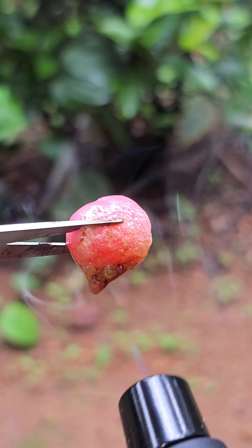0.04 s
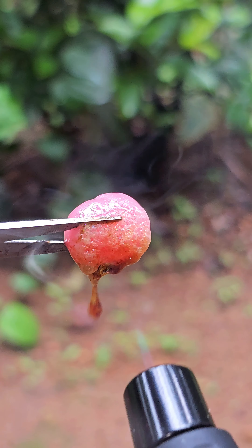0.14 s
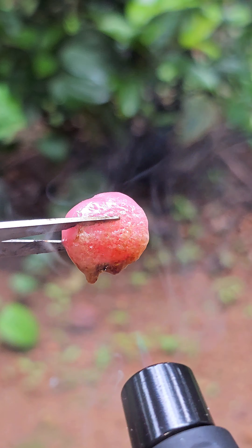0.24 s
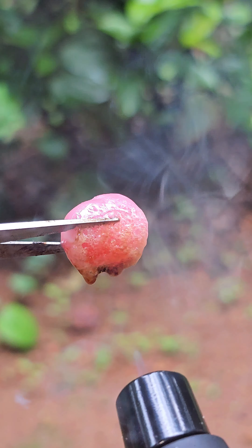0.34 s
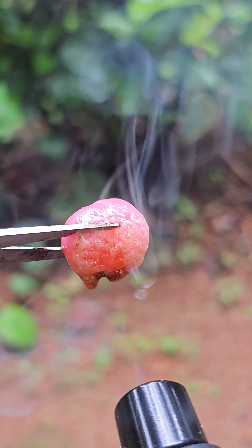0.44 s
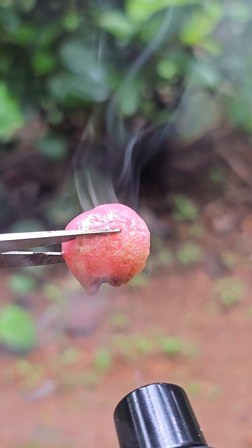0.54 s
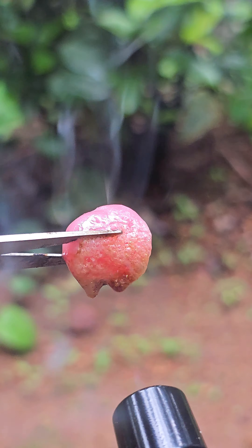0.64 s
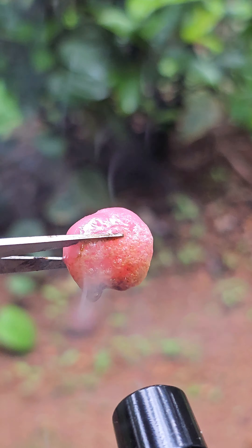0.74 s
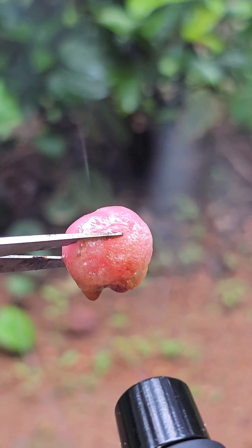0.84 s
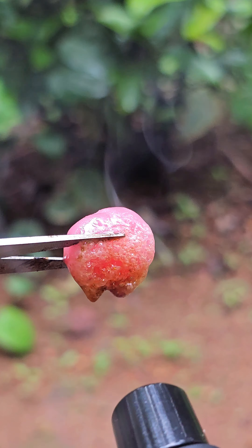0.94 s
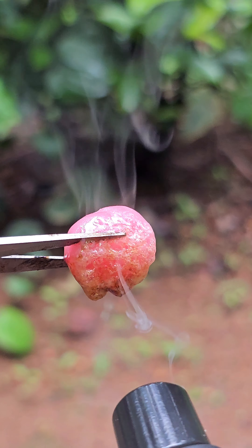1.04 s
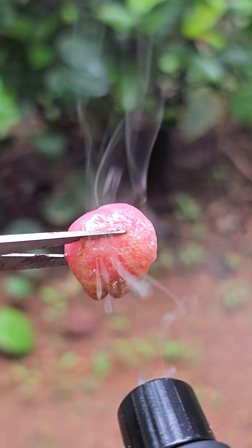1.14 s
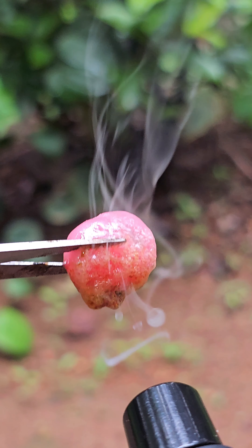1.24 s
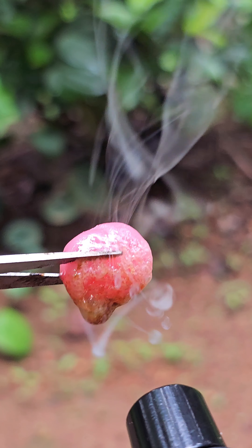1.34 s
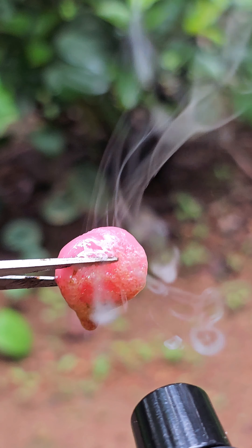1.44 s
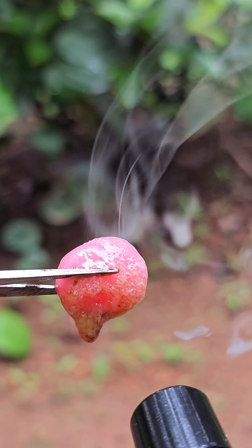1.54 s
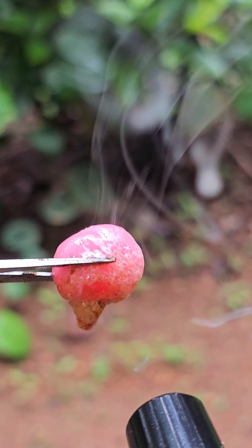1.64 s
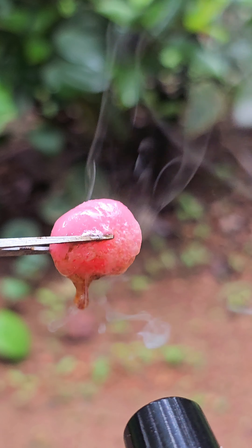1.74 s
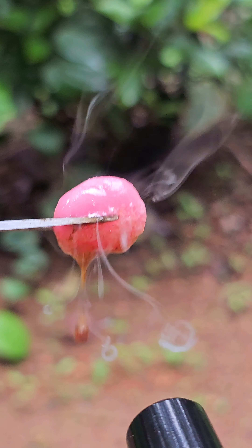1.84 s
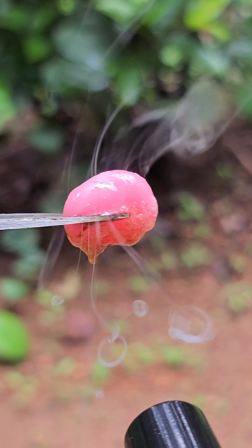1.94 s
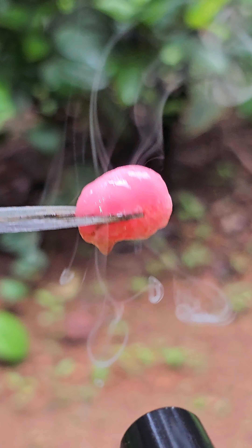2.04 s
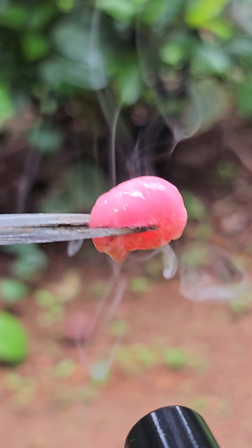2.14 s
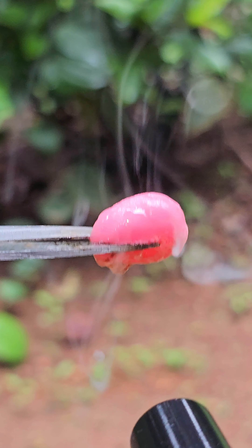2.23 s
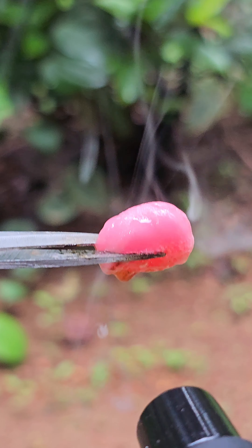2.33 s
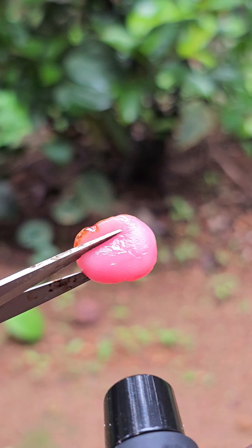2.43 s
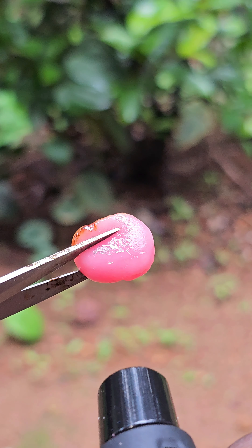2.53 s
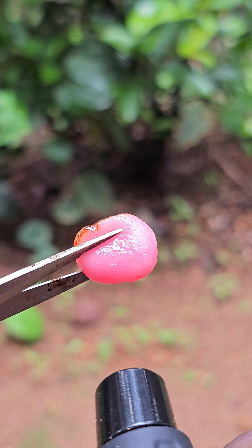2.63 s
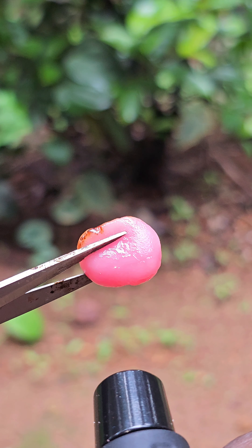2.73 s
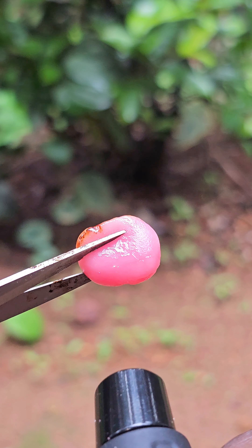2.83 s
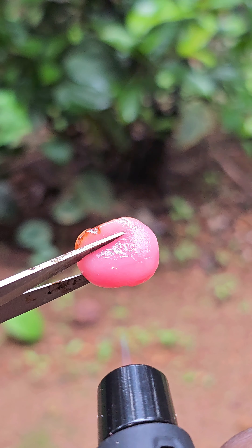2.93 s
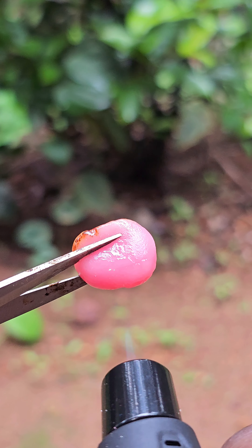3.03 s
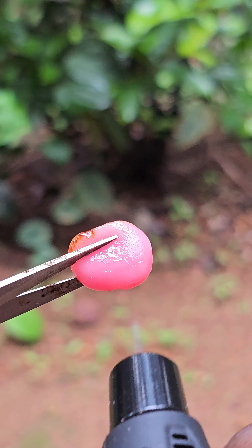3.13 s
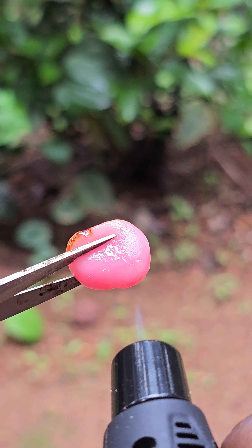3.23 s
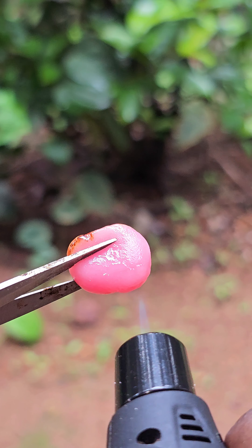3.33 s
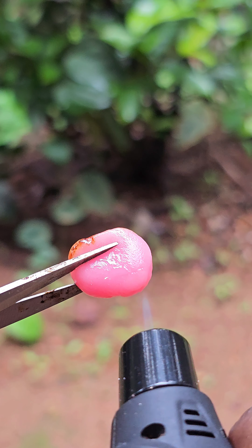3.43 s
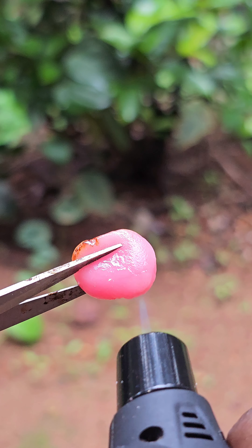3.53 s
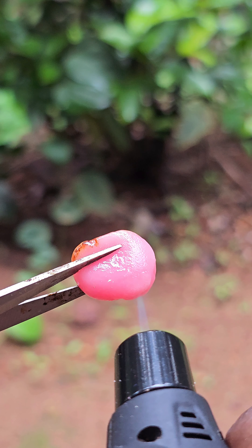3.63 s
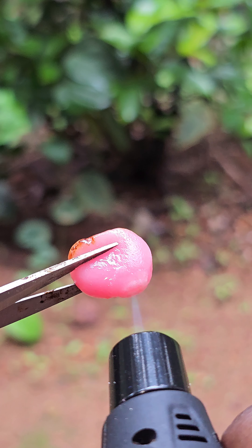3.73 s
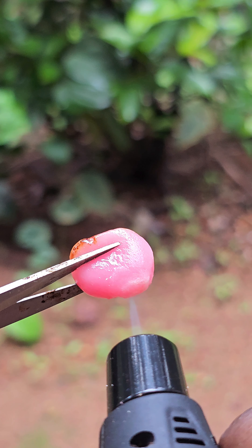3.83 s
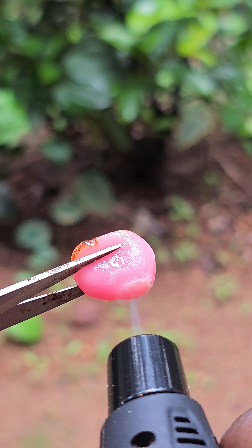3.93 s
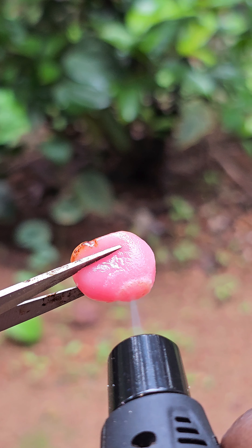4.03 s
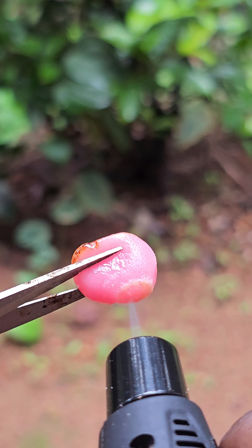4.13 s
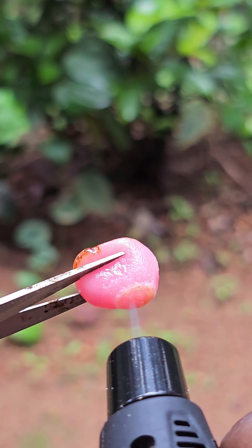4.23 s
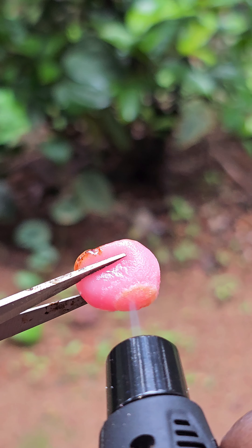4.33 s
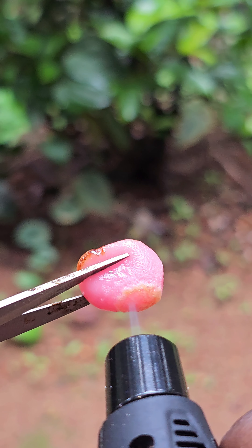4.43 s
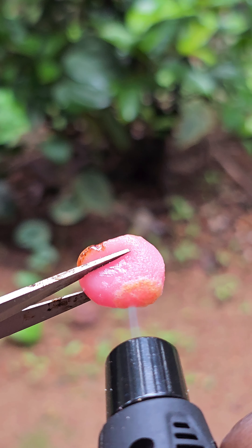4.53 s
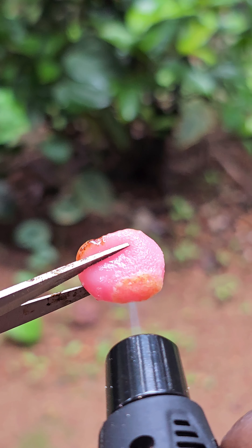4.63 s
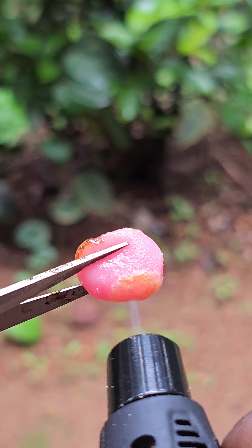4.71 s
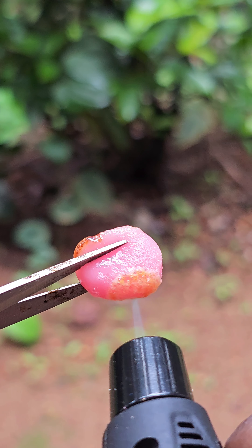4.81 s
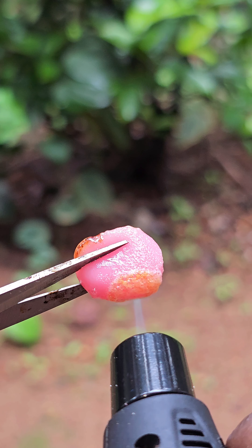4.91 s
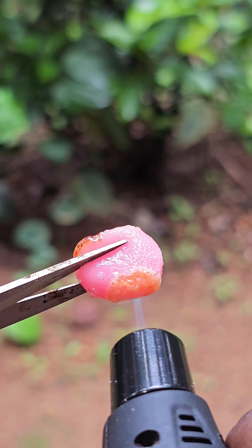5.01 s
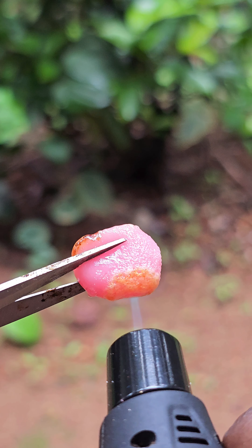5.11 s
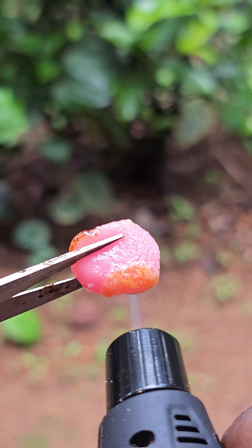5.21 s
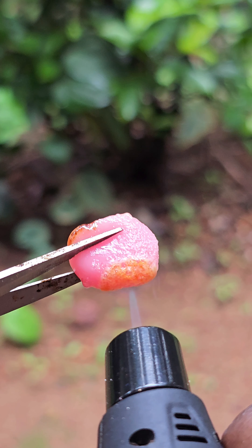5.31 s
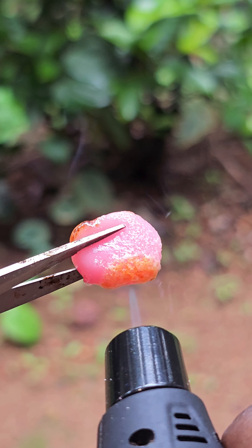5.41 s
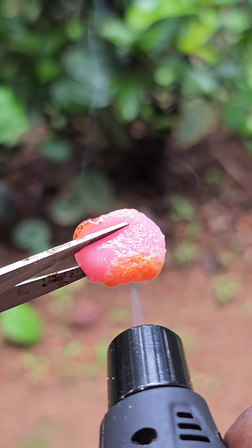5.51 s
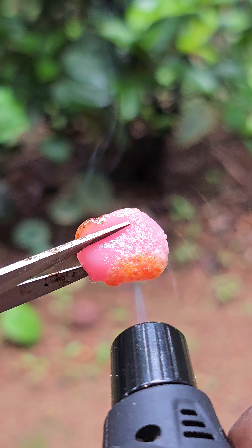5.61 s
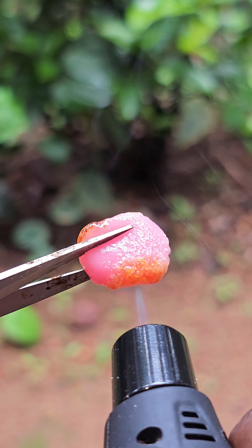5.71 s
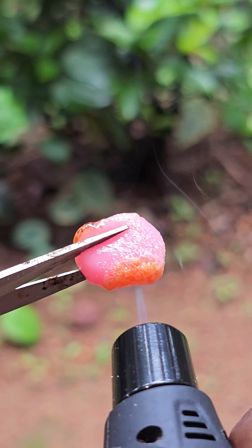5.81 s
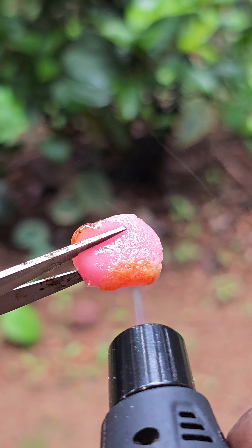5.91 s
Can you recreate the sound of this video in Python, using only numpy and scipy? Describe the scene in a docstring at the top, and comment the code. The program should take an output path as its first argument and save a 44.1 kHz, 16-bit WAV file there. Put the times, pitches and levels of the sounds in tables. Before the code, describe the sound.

Near stereo microphone in a quiet garden: airy, roaring jet flame for about a second, then a plastic-metal trigger click and abrupt silence. In the pause, small bubbles pop and fizz, with a soft knock and thin steamy squeals above faint low rumble. Cold gas begins to hiss, the igniter cracks hard with a short metallic ring and dull pop, and the bright flame hiss resumes and continues.

```python
"""Butane torch on a sweet

A butane jet torch melts a sweet held in tweezers, outdoors: shaped stereo noise hisses and flutters.
The trigger snaps back with struck modes and cracks; the starved flame sputters, whistles and goes out.
Noise bursts tick, sugar sizzles and narrow noise squeals in the pause, over soft air and far machines.
Gas hisses unlit, the piezo igniter cracks, the gas catches with a low thump and the jet burns on."""
import sys
import numpy as np
from scipy.fft import rfft, irfft, next_fast_len
from scipy.io import wavfile
from scipy.ndimage import uniform_filter1d, map_coordinates

SR = 44100
rng = np.random.default_rng(int(sys.argv[2]) if len(sys.argv) > 2 else 0)


def inscribe(sig):
    """Save sig as 16-bit PCM at rate SR to the path in sys.argv[1].

    A 1-D sig is mono; a 2-D sig holds one channel per row.
    Samples are clipped to [-1, 1] before scaling.
    """
    pcm = np.round(np.clip(np.atleast_2d(sig).T, -1, 1) * 32767)
    wavfile.write(sys.argv[1], SR, pcm.astype(np.int16))


N = 262836

OFF, LIT = 0.95, 2.936  # the first flame starts to starve, the gas lights (s)

# stereo image of the torch in its first position: f/Hz, left phase lead/rad, likeness of the ports/0-1
FIRST_IMAGE = [(100, 0, 0.98), (600, 0, .88), (1300, 0.7, 0.8), (2300, 0.55, 0.76), (3480, 1.66, 0.8),
               (4220, 2, 0.77), (5000, 3.1, 0.77), (6130, 5.0, 0.68), (7260, 5.5, 0.66), (8200, 7, 0.8),
               (10900, 10.5, 0.3), (11800, 11, 0.5), (14000, 6, 0.26), (15600, 24, 0.5)]
# stereo image of the torch in its second position: f/Hz, left phase lead/rad, likeness of the ports/0-1
SECOND_IMAGE = [(100, -0.5, 1), (493, 0.13, 0.86), (1300, 0.64, 0.82), (2280, 1, 0.77), (3260, 2.5, 0.66),
                (3680, 3, 1), (4430, 3, 1), (4980, 3, 0.67), (6050, 5.8, 0.79), (7420, 6.5, 0.93),
                (8520, 9, 1), (9300, 10.5, 0.3), (10340, 12.5, 0.5), (12160, 17.5, 0.71),
                (15300, 26.5, 0.55)]
# wide image of air, rattle and sizzle: f/Hz, left phase lead/rad, likeness of the ports/0-1
OPEN_IMAGE = [(60, 0.017, 1), (250, 0, 0.86), (700, 0, 0.17), (3000, 0, 0.05), (12000, 0, .05)]
# modes of the torch body, levels relative to the contact:
# f/Hz, level under the igniter hammer/dB, level under the returning trigger/dB, t60/s
BODY = [(560, -16, -9, .008), (900, -19, -13, .012), (1350, -4.5, 0.5, 0.019), (1950, -15, -9, .016),
        (2750, -16, -11, .008), (3330, -6, -2, 0.016), (3850, -15, -5, .011), (4400, -9, -2, 0.018),
        (5500, -2, -8, .008), (6130, 2, -19, 0.0093), (6950, -13, -11, 0.04), (8100, -8, -22, 0.012),
        (11700, -4, -13, 0.012), (15500, -8, -7, .018)]


def amp(db):
    """Decibels to gain."""
    return 10 ** (np.asarray(db) / 20)


def unit(x):
    """Scale so that the middle of the stereo image has rms 1."""
    middle = np.atleast_2d(x).mean(axis=0)
    return x / np.sqrt(np.mean(middle ** 2) + 1e-20)


def clock():
    """The time of every sample (s)."""
    return np.arange(N) / SR


def along(rows, hz):
    """Each column of a table, read on a log frequency axis."""
    f, *cols = np.transpose(rows)
    return np.array([np.interp(np.log(hz + 1), np.log(f), c) for c in cols])


def curves(rows):
    """Each column of a table, read at every sample."""
    s, *cols = np.transpose(rows)
    return [np.interp(clock(), s, c) for c in cols]


def wobble(rate):
    """A smooth random curve through normally distributed knots, rate knots a second."""
    knots = rng.standard_normal(int(N * rate / SR) + 4)
    steps = np.arange(0, len(knots) - 1, 1 / 8)
    return np.interp(clock() * rate, steps, map_coordinates(knots, [steps]))


def filtered(x, response):
    """Shape the spectrum of x by a response of frequency."""
    size = next_fast_len(N + SR // 4)
    hz = np.fft.rfftfreq(size, 1 / SR)
    return irfft(rfft(x, size) * response(hz), size)[..., :N]


def rise(start, length):
    """A ramp from 0 to 1."""
    return np.clip((clock() - start) / length, 0, 1)


def fade(start, t60):
    """1 until start, then an exponential decay."""
    return amp(-60 * np.clip((clock() - start) / t60, 0, 10))


def blow(start, t60):
    """A quick onset and its decay."""
    return rise(start, length=.0004) * fade(start, t60)


def ring(start, hz, t60, attack):
    """One struck mode: a decaying sine that swells over the time of contact."""
    t = np.arange(int(2 * t60 * SR)) / SR
    mode = np.sin(2 * np.pi * hz * t) * amp(-60 * t / t60) * (1 - np.exp(-t / attack))
    return np.pad(mode, (round(start * SR), N))[:N]


def rush(colour, image):
    """Stereo noise: each port has its own colour, and part of the sound is common to both."""
    def ports(hz):
        lead, alike = along(image, hz)
        turn = np.arccos(np.clip(alike, 0, 1)) / 2
        port = amp(along(colour, hz)) * np.exp(.5j * np.array([lead, -lead]))
        common = port * np.cos(turn)
        opposed = port * np.sin(turn) * [[1], [-1]]
        return np.array([common, opposed])
    return unit(filtered(rng.standard_normal((2, 1, N)), ports).sum(axis=0))


def tone(hz, db, waver, waver_rate, flicker_db):
    """A faint sine that wavers in pitch and comes and goes."""
    pitch = hz * (1 + waver * wobble(waver_rate))
    return amp(db + flicker_db * wobble(25.05)) * np.sin(2 * np.pi * np.cumsum(pitch) / SR)


def murmur(start, length, hz, rate):
    """Narrow noise around a pitch swells and dies away; a higher knot rate makes it breathier."""
    phase = 2 * np.pi * np.cumsum(hz * np.ones(N)) / SR
    noise = wobble(rate) * np.sin(phase) + wobble(rate) * np.cos(phase)
    return np.sin(np.pi * rise(start, length)) * noise


def far_machines():
    """A thin whine, and a far engine that drones and drops away, as wavering tones."""
    # engine drone: t/s, f/Hz, level/dB
    drone = [(0.1, 149.4, -81), (0.4, 135, -67), (0.7, 100.2, -70), (1.1, 97, -65), (1.4, 95, -90)]
    whine = tone(1370, db=-89.5, waver=0.067, waver_rate=210, flicker_db=3.0)
    return whine + tone(*curves(drone), waver=0.04, waver_rate=30, flicker_db=3.5)


def far_swells():
    """Narrow noise, far off, swells faintly in the mid range."""
    # swells: start t/s, length/s, f/Hz, knot rate of the noise/Hz, level/dB
    swells = [(1.78, .24, 1340, 200, -82), (2.22, .5, 1340, 350, -81), (2.36, .42, 1800, 600, -80)]
    return sum(amp(db) * murmur(s, length, hz, rate) for s, length, hz, rate, db in swells)


def garden():
    """Soft outdoor air over a slowly growing rumble and a low throb, with far machines behind."""
    # colour of the air: f/Hz, left level/dB, right level/dB
    colour = [(25, -11, -16), (49.4, -4, -4), (97.5, -11, -10.5), (160, -16, -22), (260, -19, -17),
              (366, -24, -32.5), (910, -30.5, -32.5), (1390, -31.5, -37.5), (2300, -38.5, -41),
              (5140, -41, -36.5), (6900, -49.5, -50.5), (10000, -62, -69), (11700, -43, -44.5),
              (16100, -36.5, -39.5)]
    air = rush(colour, OPEN_IMAGE)
    low = unit(filtered(air, lambda hz: (hz > 30) & (hz < 300)))
    high = unit(filtered(air, lambda hz: hz >= 300))
    pitch = 47 + 1.8 * wobble(6.2)  # Hz
    throb = amp(-0.5 + 4.4 * wobble(6.0)) * np.sin(2 * np.pi * np.cumsum(pitch) / SR)
    lull_db = 6 * np.exp(-((clock() - 3.32) / 0.24) ** 2)  # the rumble dips briefly
    rumble_db = -67.5 + 0.7 * clock() - lull_db
    rumble = amp(rumble_db) * (low + throb)
    return rumble + amp(-75 + 0.75 * wobble(7.97)) * high + far_machines() + far_swells()


def ticks():
    """Bursting sugar bubbles and tweezer ticks, plus the click of the hand's knock on the torch body: short
    decaying bursts of band-shaped noise."""
    # ticks ahead of the stereo tilt: t/s, level/dB, centre f/Hz
    tick_rows = [(1.0135, -63, 5500), (1.018, -57, 1650), (1.234, -73, 11000), (1.2524, -69, 5030),
                 (1.4862, -61, 1650), (1.5617, -69, 5600), (1.5625, -70, 13000), (1.6231, -72, 13500),
                 (1.6400, -74, 13500), (1.7732, -72, 6200), (1.9054, -71, 14000), (2.086, -75, 14000),
                 (2.1953, -76, 8500), (2.553, -72, 3800), (2.2888, -55.5, 6500), (2.2892, -54.5, 14000)]
    width_octaves, t60 = 0.52, 0.015  # t60 in s
    out = np.zeros((2, N))
    t = np.arange(SR // 10) / SR
    hz = np.fft.rfftfreq(len(t), 1 / SR)
    for s, db, centre_hz in tick_rows:
        band = np.exp(-(np.log2((hz + 1) / centre_hz) / width_octaves) ** 2)
        tick = unit(irfft(rfft(rng.standard_normal((2, len(t)))) * band, len(t)))
        out[:, round(s * SR):][:, :len(t)] += amp(db - 60 * t / t60) * tick
    return out


def sizzle():
    """Drops of sugar flare up over a fine crackle that dies down as the sweet cools."""
    # colour of the sizzle: f/Hz, left level/dB, right level/dB
    colour = [(600, -45, -45), (1800, -17, -20), (3000, -10, -7.5), (4500, -5, -8), (5400, -7, 4.5),
              (6200, -8, -4), (8000, -7, -6), (10000, -6, -13), (11400, -17, -0.5), (13000, -11, -15),
              (14500, -7, -9), (15600, -14, -4)]
    # flaring drops ahead of flicker and stereo tilt: t/s, level/dB, t60/s
    flare_rows = [(0.609, -52, 0.22), (2.2864, -57, 0.2), (4.289, -53, .16)]
    flares = sum(amp(db) * blow(s, t60) for s, db, t60 in flare_rows)
    simmer = amp(-78.5 + 4.1 * wobble(150)) * fade(OFF, t60=3.4)
    return (flares * amp(1.6 * wobble(300)) + simmer) * rush(colour, OPEN_IMAGE)


def steam():
    """Steam squeals out of the hot sweet: breathy narrow noise whose pitch sags as it escapes."""
    # squeals ahead of the stereo tilt: start t/s, length/s, starting f/Hz, level/dB
    squeals = [(1.25, .12, 4860, -81), (1.83, .12, 5420, -85), (1.92, .13, 5020, -84),
               (2.03, .17, 4590, -82), (2.345, .09, 5470, -80)]
    sag = 1600  # Hz/s
    out = 0
    for s, length, hz, db in squeals:
        pitch = hz - sag * length * rise(s, length)
        out = out + amp(db) * murmur(s, length, pitch, rate=250)
    return out


def sugar():
    """Bubbles burst, drops flare and steam squeals, each tilted a little to the right."""
    return (ticks() + sizzle()) * amp([[-2], [1.5]]) + steam() * amp([[-5], [2]])


def struck_body(start, modes, level_db, attack):
    """A contact rings the body modes; neighbouring modes swing in opposite directions."""
    return sum((-1) ** k * amp(level_db + db) * ring(start, hz, t60, attack)
               for k, (hz, db, t60) in enumerate(modes))


def burst(noise, envelope):
    """A short burst that keeps the colour and strength of its noise."""
    def smooth(z):
        return np.sqrt(np.abs(uniform_filter1d(np.abs(z) ** 2, size=N // 40)) + 1e-12)
    z = rfft(noise * envelope)
    recoloured = irfft(z * smooth(rfft(noise)) / smooth(z), N)
    return recoloured * np.sqrt(np.mean(envelope ** 2))


def snap(contacts, modes, colour, image, pan_db):
    """Each contact cracks, rings the body and leaves the parts rattling."""
    # colour of the rattle: f/Hz, left level/dB, right level/dB
    rattle_colour = [(100, -45, -45), (300, -17, -9), (1000, -13, -23), (2490, -10, -12), (4300, -3, -1.5),
                     (6300, -4, -4), (7500, -7, -10), (10000, -15, -16), (11700, -9, -10),
                     (13000, -14, -16), (15600, -10, -14)]
    crack, rattle = rush(colour, image), rush(rattle_colour, OPEN_IMAGE)
    out = np.zeros((2, N))
    for s, ring_db, crack_db, crack_t60, rattle_db in contacts:
        body = struck_body(s, modes, ring_db, attack=0.00014)
        # the ringing reaches the right port a little later
        body = np.array([body, np.roll(body, SR // 11000)])
        out += body * amp([[pan_db / 2], [-pan_db / 2]])
        out += amp(crack_db) * burst(crack, blow(s, crack_t60))
        out += amp(rattle_db) * rattle * blow(s, t60=0.23)
    return out


def release():
    """The trigger slips, hits its stop and bounces."""
    # contacts: t/s, ring level ahead of pan/dB, crack level/dB, crack t60/s, rattle level/dB
    contacts = [(0.9618, -56, -41, .04, -70), (0.965, -32, -27.5, .010, -61),
                (0.9665, -40, -36.5, .018, -67)]
    # colour of the crack: f/Hz, left level/dB, right level/dB
    colour = [(150, -30, -30), (540, -11, -11), (780, -11, -17), (1340, 0, -9), (2404, -12, -12),
              (3000, -1, 1), (3900, -3, 2), (4730, -4, 3), (5500, -11, -3), (7000, -5, -8),
              (8440, -22, -16), (10200, -23, -15), (11200, -12, -9), (13000, -13, -17), (14300, -4, -14),
              (15600, -12, -17)]
    modes = [(hz, db, t60) for hz, _, db, t60 in BODY]
    return snap(contacts, modes, colour, FIRST_IMAGE, pan_db=-7.0)


def knock():
    """The hand softly knocks the torch body, ringing mainly its low modes."""
    modes = [(hz, db, t60) for hz, _, db, t60 in BODY]
    body = struck_body(1.4862, modes, level_db=0, attack=0.00026)
    return amp(-51) * filtered(body, lambda hz: 1 / (1 + 1j * hz / 2600) ** 2)


def lead_in():
    """A faint band of noise swells just before the strike, stronger on the right."""
    noise = rng.standard_normal((2, N))
    band = unit(filtered(noise, lambda hz: np.exp(-((hz - 4700) / 950) ** 2)))
    swell = rise(LIT - .016, length=0.014) ** 2 * fade(LIT, t60=0.0092)
    return amp([[-42], [-31]]) * band * swell


def spring():
    """The igniter spring rings on as a cluster of modes, each scattered in level between the ports."""
    # spring modes: f/Hz, level ahead of scatter/dB, t60/s
    modes = [(1933, -56, .2), (2530, -53, 0.084), (3860, -51, .15), (4075, -50, .2), (4390, -43, .16),
             (4470, -46, .16), (4650, -43, .15), (5157, -49, .14), (5630, -46, .1), (6000, -44, 0.16),
             (6450, -48, .16), (6900, -47, .14), (7620, -54, .15), (15420, -47, .1)]
    return sum(amp(db + rng.normal(0, 1.5, (2, 1))) * ring(LIT, hz, t60, attack=.002)
               for hz, db, t60 in modes)


def igniter():
    """After a faint swell of noise the piezo hammer strikes and bounces, and its spring rings on."""
    # contacts: t/s, ring level/dB, crack level/dB, crack t60/s, rattle level/dB
    contacts = [(2.935, -15, -9.5, .0085, -38.5), (2.9362, -33, -22, .009, -55),
                (2.9388, -32, -25, .009, -55)]
    # colour of the crack: f/Hz, left level/dB, right level/dB
    colour = [(133, -38, -38), (400, -18, -20), (800, -20, -22), (1350, -12, -13), (2200, -12, -15),
              (3000, -6, -7), (4100, -11, -1), (5000, -11, 1), (6000, 1, 1), (7300, -6, -9),
              (10000, -21, -16), (11500, -6, -7), (13000, -8, -15), (15600, -3, -12)]
    modes = [(hz, db, t60) for hz, db, _, t60 in BODY]
    return lead_in() + snap(contacts, modes, colour, SECOND_IMAGE, pan_db=0.0) + spring()


def trigger():
    """The trigger is let go, the hand knocks the body, and later the igniter fires."""
    return release() + knock() + igniter()


def ignition():
    """The gas in the burner catches: a push of air and a hollow pop that hums on briefly in the tube."""
    # levels ahead of the filter and stereo tilt
    push = -amp(-22.5) * ring(2.9362, hz=90.0, t60=0.035, attack=0.0012)
    pop = -amp(-21.5) * ring(2.9374, hz=246, t60=0.022, attack=0.0015)
    hum = -amp(-45) * ring(2.9374, hz=260, t60=0.14, attack=0.002)

    def thump_band(hz):
        return hz ** 2 / (hz ** 2 + 30 ** 2) / (1 + (hz / 340) ** 8)
    return filtered(push + pop + hum, thump_band) * amp([[1.2], [-1.2]])


def jet():
    """Turbulence shaped by the burner tube; its colour shifts as the torch is aimed."""
    # colour of the flame in the first position: f/Hz, left level/dB, right level/dB
    first_colour = [(200, -12.5, -12.5), (474, -9, -17), (730, -5.5, -4), (1080, -7, -10.5), (2980, -5, -5),
                    (3680, -5, -4.5), (4060, -8, -0.5), (4600, -9, -5), (5500, -11, -2),
                    (5950, -10.5, -6.5), (6600, -12, -12), (8300, -15.5, -14.5), (9500, -33, -30.5),
                    (11240, -14, -14.5), (13000, -15, -24), (15600, -11, -23)]
    # colour of the flame in the second position: f/Hz, left level/dB, right level/dB
    second_colour = [(197, -11, -11), (483, -3, -10.5), (740, -4.5, -3.5), (1030, -5, -8.5),
                     (3270, -6, -5.5), (4350, -9, -9.5), (4770, -7.5, -4.5), (5430, -13.5, 0.5),
                     (6240, -11.5, -6), (6820, -11.5, -11.5), (8000, -15, -14), (10150, -29.5, -29),
                     (12630, -10, -12.5), (15600, -8, -17.5)]
    # peaks and dips of the burner tube: f/Hz, width/Hz, left level/dB, right level/dB
    burner = [(260, 48, 8, 9.5), (372, 43, -6, -10), (850, 76, 2, 0.5), (1345, 190, 5.5, 2.5),
              (1660, 62, -2.5, 2.5), (1850, 116, 3.5, 3), (2077, 100, 6.5, 2), (2290, 60, -2.5, -3),
              (2540, 150, -1, 2.5), (5850, 150, -6, -0.5), (15700, 300, 0.5, 3.5)]
    # turn from the first position to the second: t/s, share/0-1
    aim = [(1.0, 0), (2.9, 0.54), (3.5, 0.9), (4.4, 0.93)]

    def tube(hz):
        shape_db = sum(np.outer(db, np.exp(-((hz - fc) / width) ** 2)) for fc, width, *db in burner)
        return amp(shape_db) * hz ** 2 / (hz ** 2 + 90 ** 2)
    turned = np.clip(curves(aim)[0], 0, 1)
    first = np.sqrt(1 - turned) * rush(first_colour, FIRST_IMAGE)
    second = np.sqrt(turned) * rush(second_colour, SECOND_IMAGE)
    return filtered(first + second, tube)


def flame(noise, start, end, hiss_db, flutter_db):
    """Roar, hiss and fizz follow the strength of the flame and flutter together with the flow."""
    # strength of the flame ahead of flutter: t/s, level/dB
    strength = [(0.2, -53), (0.85, -56), (3.0, -53), (4.1, -52.5), (4.7, -54), (5.3, -53.5), (5.42, -53)]
    # fizz, the treble of the flame, against its strength: t/s, level/dB
    treble = [(0.0, -5), (0.25, -3.5), (0.8, -11), (3.0, -3), (4.1, -2.5), (5.25, 2.5), (5.5, 0.5)]
    flow_db = curves(strength)[0] + flutter_db * wobble(45)
    # each burn starts with a bright hiss that sinks by 3 dB, time constant 1.07 s
    mellow_db = 3 * (1 - np.exp(-np.maximum(clock() - start, 0) / 1.07))
    burning = (clock() >= start) & (clock() <= end)
    layers = [(0, 3000, 0, 0.6),  # roar: low edge/Hz, high edge/Hz, level/dB, wander/dB
              (3000, 9500, hiss_db - mellow_db, 0.4),
              (9500, SR, curves(treble)[0], 0.4)]
    out = 0
    for lo, hi, db, wander_db in layers:
        band = filtered(noise, lambda hz: (hz >= lo) & (hz < hi))
        level = amp(flow_db + db + wander_db * wobble(14))
        out = out + level * band / band.mean(axis=0)[burning].std()
    return out


def dying(noise):
    """The shrinking flame sputters and whistles in the tube, then goes out at once."""
    flame_out = 1.012  # the last gas is spent (s)
    roar = unit(filtered(noise, lambda hz: 1 / (1 + (hz / 1500) ** 8)))
    sputter = amp(-57.5 + 2.5 * wobble(160)) * roar * fade(OFF, t60=.3)
    pitch = 2030 * (1 + 0.0079 * wobble(149.7)) + 110 * rise(flame_out - .008, length=0.011)
    whistle = amp(-58.0 + 1.2 * wobble(119.3)) * np.sin(2 * np.pi * np.cumsum(pitch) / SR)
    return (sputter + whistle) * rise(OFF, length=.012) * fade(flame_out, t60=.035)


def unlit_gas():
    """Cold gas hisses ever harder from the opening valve, then fades once it is lit."""
    # colour of the gas: f/Hz, left level/dB, right level/dB
    colour = [(500, -46, -42), (1500, -15, -21), (2650, -13, -8), (3700, -23, -28), (4400, -20, -17),
              (5270, -16, -0.5), (6000, -18, -4.5), (7500, -2.5, -4), (10100, -14, -9), (11400, -8, -9),
              (12500, -9, -6), (14500, -1, -10), (15600, -2, -8)]
    gas_on = 2.695  # s
    valve = amp(-63 + 5.0 * rise(gas_on, length=0.25))
    valve = valve * rise(gas_on - .012, length=0.028) * fade(LIT, t60=.2)
    return valve * amp(0.5 * wobble(35)) * rush(colour, FIRST_IMAGE)


def torch():
    """The first flame starves as the valve shuts; later cold gas flows ever harder, then catches."""
    # burns: start t/s, end t/s (the span that sets the level), starting hiss against the strength/dB
    burns = [(0.0, 0.96, 1), (2.936, 5.96, -0.3)]
    noise = jet()
    first = flame(noise, *burns[0], flutter_db=1.0) * fade(OFF, t60=0.17)
    second = flame(noise, *burns[1], flutter_db=0.72) * rise(LIT, length=0.016)
    # after lighting, the low roar takes a moment to build
    roar = filtered(second, lambda hz: 1 / (1 + (hz / 1300) ** 4))
    second = second - roar * (1 - rise(LIT, length=0.09))
    return first + dying(noise) + unlit_gas() + second


def scene():
    """Everything that reaches the two ports."""
    return garden() + sugar() + trigger() + ignition() + torch()


def record(dry):
    """A very steep low-pass leaves almost nothing above 15850 Hz."""
    return filtered(dry, lambda hz: 1 / (1 + (hz / 15850) ** 200))


dry = scene()
out = record(dry)
inscribe(out)
```